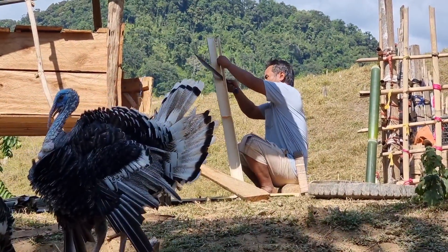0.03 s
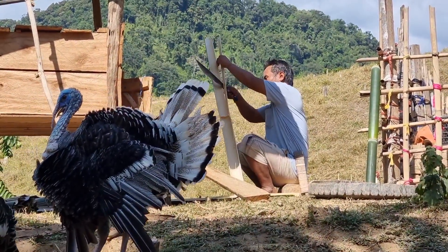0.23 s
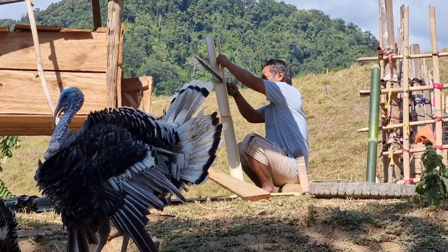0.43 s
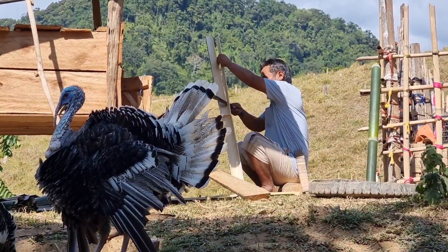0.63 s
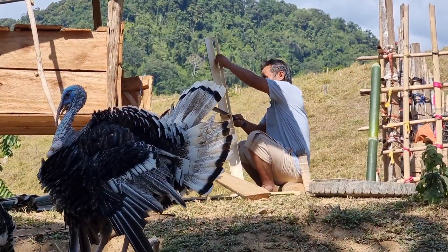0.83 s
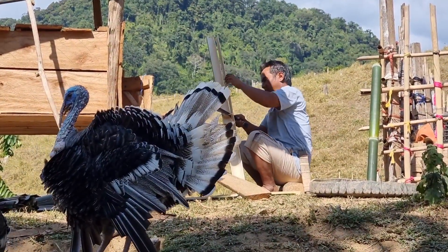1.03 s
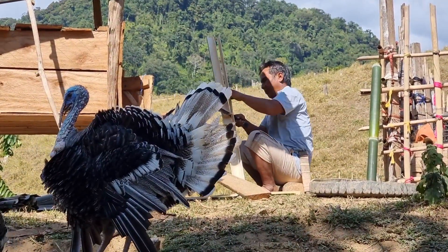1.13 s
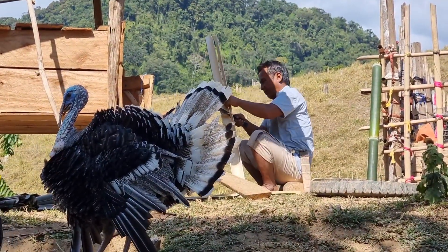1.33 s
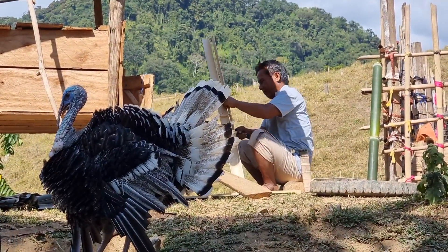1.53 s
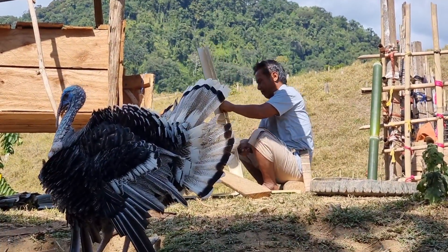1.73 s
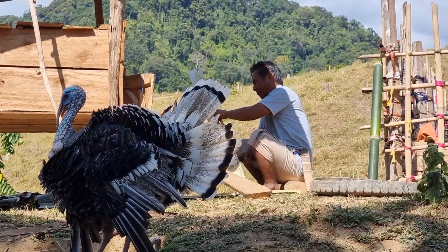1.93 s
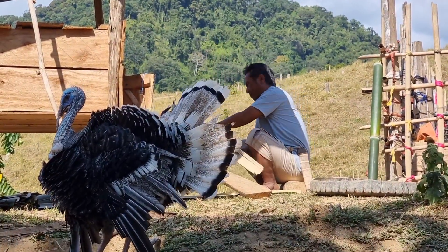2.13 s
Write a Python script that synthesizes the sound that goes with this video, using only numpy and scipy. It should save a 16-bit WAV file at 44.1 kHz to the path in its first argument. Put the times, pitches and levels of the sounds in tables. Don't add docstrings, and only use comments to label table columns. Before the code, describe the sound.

A bamboo pole splits with one sharp crack under a blade, followed by light scrapes and ticks

```python
import sys
import numpy as np
from scipy import signal
from scipy.fft import rfft, irfft
from scipy.io import wavfile
from scipy.ndimage import uniform_filter1d

SR = 44100
rng = np.random.default_rng(int(sys.argv[2]) if len(sys.argv) > 2 else 0)


def nominal_scale(level):
    x = np.asarray(level, float) / 20
    return 10 ** x


def log_audio(samples):
    frames = np.atleast_2d(samples).T
    limited = np.clip(frames, -1, 1)
    pcm = np.round(limited * 32767).astype(np.int16)
    wavfile.write(sys.argv[1], SR, pcm)


N = 97020


def evened(x):
    return x / np.sqrt(np.mean(x ** 2) + 1e-20)


def read(points, hz):
    f, value = np.transpose(points)
    return np.interp(np.log(hz + 1), np.log(f + 1), value)


def shape(x, gain):
    return irfft(rfft(x) * gain(np.fft.rfftfreq(N, 1 / SR)), N)


def high_pass(hz, cut_hz, steepness):
    return 1 / (1 + (cut_hz / (hz + 1)) ** steepness)


def ports(x, other, lead, alike, right_db=lambda hz: 0):
    def shared(hz):
        return np.clip(alike(hz), 0, 1)

    right = shape(x, lambda hz: shared(hz) * np.exp(-1j * lead(hz)))
    right = right + shape(other, lambda hz: np.sqrt(1 - shared(hz) ** 2))
    return np.array([x, shape(right, lambda hz: nominal_scale(right_db(hz)))])


def add(mix, s, sound):
    part = mix[round(s * SR):][:len(sound)]
    part += sound[:len(part)]


def ring(hz, db, t60):
    t = np.arange(4000) / SR
    return nominal_scale(db - 60 * t / t60) * np.sin(2 * np.pi * hz * t)


# (time [s], level [dB], left minus right [dB])
WIND_GUSTS = [(0.0, -42, -12), (0.12, -49, 7.5), (0.179, -43, 20.5), (0.21, -40.5, 5.5), (0.422, -32, 6),
              (0.45, -44.5, -10), (0.479, -37, 10), (0.69, -33, -1.5), (0.77, -36, 4.5),
              (0.91, -36.5, -4.5), (0.99, -34, 8.5), (1.05, -35.5, 10.5), (1.099, -30, -14.5),
              (1.14, -37, 16), (1.26, -34.5, -8.5), (1.3, -40, 3), (2.01, -53.5, -1.5), (2.2, -44, 7)]
# (frequency [Hz], level [dB])
WIND_COLOUR = [(12, -62), (20, -0.5), (43, -1.5), (67, 3.5), (162, -24), (264, -53), (331, -37.5),
               (400, -50), (520, -60), (880, -120)]


def wind():
    buffet_hz, usual_gust_db = 110, -37.5
    t = np.arange(N) / SR
    s, db, pan = np.transpose(WIND_GUSTS)
    level_db = np.interp(t, s, db)
    noise = rng.standard_normal((2, N))
    low = np.array([evened(shape(v, lambda hz: nominal_scale(read(WIND_COLOUR, hz)))) for v in noise])
    top = shape(low, lambda hz: high_pass(hz, buffet_hz, 10))
    low = low + top * (nominal_scale(level_db - usual_gust_db) - 1)
    return low * nominal_scale(level_db + 4.5 + np.outer([.5, -.5], np.interp(t, s, pan)))


# (frequency [Hz], level [dB])
HISS_COLOUR = [(100, 1.5), (300, -3.5), (880, 0), (1220, -0.5), (1900, -4), (6000, -7), (9000, -15.5),
               (15200, -27)]
# (frequency [Hz], share [0-1])
HISS_ALIKE = [(200, .7), (950, .955), (1300, .993), (2300, .5), (4400, .08), (15000, .1)]


def hiss():
    level_db, lag_s = -47.5, 0.00044
    rustle_s, rustle_db, rustle_hz = 1.35, 2, 7500
    frames = N // 128 + 8
    bins_hz = np.fft.rfftfreq(512, 1 / SR)
    patches = uniform_filter1d(rng.standard_normal((frames, 257)), 14, 0)
    patches = evened(uniform_filter1d(patches, 8, 1))
    flicker = evened(uniform_filter1d(rng.standard_normal(frames), 10))
    field = nominal_scale(read(HISS_COLOUR, bins_hz) + 2.1 * patches + 0.4 * flicker[:, None])
    late = np.clip((np.arange(frames) * 128 / SR - rustle_s) / 0.18, 0, 1)
    field = field * nominal_scale(rustle_db * np.outer(late, high_pass(bins_hz, rustle_hz, 4)))
    streams = []
    for a, b in rng.standard_normal((2, 2, frames, 257)):
        noise = signal.istft(((a + 1j * b) * field).T, nperseg=512, noverlap=384)[1]
        streams.append(evened(noise[:N]))
    return nominal_scale(level_db) * ports(*streams, lambda hz: 2 * np.pi * hz * lag_s,
                                 lambda hz: read(HISS_ALIKE, hz), lambda hz: 1.95 * (hz > 1500))


# (time [s], length [s], from [Hz], to [Hz], level [dB])
CHIRP_SLIDES = [(.018, 0.012, 5230, 4660, -62), (.036, 0.0087, 4840, 4240, -61),
                (.075, 0.024, 5300, 6700, -56.5), (.539, 0.01, 6300, 5400, -52.5),
                (.543, 0.0069, 4240, 3670, -57), (.595, 0.028, 6100, 5480, -55.5),
                (.772, 0.014, 6000, 5500, -52), (.785, 0.0066, 5430, 4650, -56.5),
                (.8, 0.004, 5100, 4800, -58), (.813, 0.012, 5410, 4640, -50.5),
                (.89, 0.021, 5200, 5160, -52), (.924, 0.014, 6150, 5300, -53.5),
                (.93, 0.0047, 5370, 4670, -54.5), (1.305, 0.017, 5300, 5000, -65),
                (1.378, 0.0088, 4770, 4200, -60), (1.425, 0.0076, 5550, 5800, -53),
                (1.583, 0.011, 4940, 3630, -55), (1.63, 0.015, 4900, 4000, -60),
                (1.69, 0.018, 5700, 4540, -60.5), (1.771, 0.021, 6630, 3840, -58),
                (1.85, 0.04, 5530, 5220, -60), (1.986, 0.042, 6120, 5870, -55),
                (2.022, 0.013, 6060, 5500, -56)]
# (time [s], length [s], end [Hz], middle [Hz], level [dB])
CHIRP_ARCHES = [(.074, 0.015, 5240, 4590, -59), (.522, 0.047, 6300, 6570, -60.5),
                (.616, 0.027, 5300, 4690, -51), (.66, 0.028, 4870, 4770, -49),
                (.78, 0.031, 6300, 6500, -62), (1.883, 0.027, 5270, 5680, -54),
                (1.12, 0.019, 6160, 6330, -67)]


def chirps():
    out = np.zeros(N)
    kinds = ((CHIRP_SLIDES, lambda u: u ** 1.22), (CHIRP_ARCHES, lambda u: np.sin(np.pi * u)))
    for rows, path in kinds:
        for s, length, a_hz, b_hz, db in rows:
            u = np.arange(0, 1, 1 / (length * SR))
            hz = a_hz + (b_hz - a_hz) * path(u)
            swell = nominal_scale(db + 8.0) * np.sin(np.pi * u) ** 0.36
            add(out, s, swell * np.sin(2 * np.pi * np.cumsum(hz) / SR))
    flutter = uniform_filter1d(uniform_filter1d(rng.standard_normal(N), 70), 70)
    return out * nominal_scale(3.8 * evened(flutter))


# (time [s], length [s], level [dB])
FAR_WHISTLES = [
    (.205, .04, -63),
    (.28, .12, -62),
    (1.0, .22, -62),
    (1.51, .08, -61),
    (1.62, .12, -66),
    (2.13, .06, -62),
]


def far_whistles():
    start_hz, sag_hz_per_s, width_hz = 4050, 1600, 180
    out = np.zeros(N)
    r = np.exp(-np.pi * width_hz / SR)
    noise = rng.standard_normal(N) + 1j * rng.standard_normal(N)
    fuzz = signal.lfilter([1], [1, -2 * r, r * r], noise)
    fuzz /= np.std(fuzz)
    for s, length, db in FAR_WHISTLES:
        t = np.arange(0, length, 1 / SR)
        turn = np.exp(2j * np.pi * np.cumsum(start_hz - sag_hz_per_s * t) / SR)
        swell = nominal_scale(db + 4) * np.sin(np.pi * t / length) ** .5
        add(out, s, swell * (fuzz[round(s * SR):][:len(t)] * turn).real)
    return out


def birds():
    lag_s, right_db, echo_db, echo_t60 = .000447, 6, -11, .09
    song = chirps() + far_whistles()
    tail = rng.standard_normal((2, 8000)) * nominal_scale(-60 * np.arange(8000) / SR / echo_t60)
    echo = signal.fftconvolve(song[None], tail / np.linalg.norm(tail[0]), axes=1)[:, :N]
    direct = ports(song, song, lambda hz: 2 * np.pi * hz * lag_s, lambda hz: 1,
                   lambda hz: right_db * (hz > 4200))
    return direct + nominal_scale(echo_db) * echo


# (frequency [Hz], phase [rad])
KNIFE_PHASE = [(400, 0), (1100, .9), (2450, 1.2), (2650, -2), (4600, -.3), (6400, .9), (9400, 3.9),
               (15000, 4)]
# (frequency [Hz], share [0-1])
KNIFE_LIKENESS = [(800, .75), (1500, .4), (2300, .45), (2800, .9), (5500, .8), (8000, .45), (12000, .2)]
# (frequency [Hz], right minus left [dB])
KNIFE_BALANCE = [(10500, 0), (12000, 8), (15000, 10)]


def knife_ports(x, other):
    return ports(x, other, lambda hz: read(KNIFE_PHASE, hz), lambda hz: read(KNIFE_LIKENESS, hz),
                 lambda hz: read(KNIFE_BALANCE, hz))


def struck(rows):
    out = np.zeros(N)
    for s, db, hz, t60 in rows:
        add(out, s, ring(hz, db, t60) * np.minimum(np.arange(4000) * hz / SR / 2, 1))
    return out


def fibres(spread_db):
    snaps_per_s, bed = 9000, .7
    size = nominal_scale(spread_db * np.minimum(rng.exponential(1, (2, N)), 4)) * rng.standard_normal((2, N))
    snaps = size * (rng.random((2, N)) < snaps_per_s / SR)
    return [evened(v) for v in snaps + bed * rng.standard_normal((2, N))]


# (frequency [Hz], level [dB])
FIBRE_COLOUR = [(500, -30), (800, -20), (1300, -30), (2600, -4), (4700, -7), (7500, -5), (10500, -4),
                (15000, -22)]


def fibre_colour_db(hz):
    return read(FIBRE_COLOUR, hz)


# (time [s], length [s], level [dB], brightness [dB per octave])
LIGHT_SCRAPES = [(0.132, 0.019, -51, -13), (.205, .02, -48, -7), (0.486, 0.013, -70, 2),
                 (0.928, 0.022, -54, -6.5), (.995, 0.037, -54, -7.5), (1.131, 0.02, -63, -4),
                 (1.421, .02, -57, -10), (1.512, 0.05, -58, -2), (1.55, .05, -58, -2),
                 (1.786, 0.014, -57, -2), (1.79, .028, -53, -6), (1.963, .007, -49, -6),
                 (1.967, .011, -48, -3), (1.976, 0.013, -45, -9), (1.992, 0.012, -46, -10),
                 (2.002, 0.018, -52, -11)]
# (time [s], level [dB], frequency [Hz], t60 [s])
POLE_TICKS = [(1.482, -37, 430, .03), (1.483, -41, 640, .03), (1.484, -43, 900, .03),
              (1.212, -42, 3300, .01), (1.9705, -32, 5400, .014), (1.9705, -32, 4050, .014),
              (1.973, -31, 4100, .008), (1.9845, -36, 2300, .01), (.208, -42, 2200, .015),
              (.244, -43, 2000, .02), (1.9805, -33, 6400, .01), (1.982, -32, 3200, .008),
              (1.9963, -30, 3250, .008), (1.9978, -28, 3300, .01), (1.998, -36, 4500, .008),
              (2.013, -38, 2750, .015)]


def scrapes():
    out = np.zeros((2, N))
    grain = np.array(fibres(spread_db=4.5))
    t = np.arange(N) / SR
    for s, length, db, tilt_db in LIGHT_SCRAPES:
        def colour(hz):
            tilt = tilt_db * np.log2(np.maximum(hz, 3000) / 4000)
            return nominal_scale(0.2 * fibre_colour_db(hz) + tilt - 16 * (hz < 1500))

        stroke = np.sin(np.pi * np.clip((t - s) / length, 0, 1) ** 0.6)
        out += shape(grain * stroke, colour) * nominal_scale(db + 11.0)
    return knife_ports(out[0] + struck(POLE_TICKS), out[1])


# (frequency [Hz], level [dB], t60 [s])
POLE_TONES = [(620, -14, .035), (1860, -5, .025), (2420, 2, .025), (2800, 1, .018), (3350, -3, .018),
              (4450, -3, .018), (4750, -2, .02), (5620, -6, .015), (6450, -4, .015), (9300, -3, .015)]
# (time [s], level [dB])
TEAR_EFFORT = [
    (.605, -91),
    (0.651, -38),
    (0.678, -30.5),
    (0.6845, -34.5),
    (0.6885, -15),
    (0.693, -17.5),
    (0.702, -27.5),
    (0.723, -41),
    (.79, -64),
]


def tearing():
    s, db = np.transpose(TEAR_EFFORT)
    effort = nominal_scale(np.interp(np.arange(N) / SR, s, db, -140, -140))
    pole = sum(ring(*tone) for tone in POLE_TONES)
    pole = pole / np.linalg.norm(pole)

    def colour(hz):
        return nominal_scale(fibre_colour_db(hz))

    norm = np.sqrt(np.mean(colour(np.fft.rfftfreq(N, 1 / SR)) ** 2))
    out = []
    for v in fibres(spread_db=1.5):
        direct = shape(v * effort, colour) / norm
        out.append(direct + nominal_scale(-12) * signal.oaconvolve(v * effort, pole)[:N])
    return np.array(out)


def snap():
    hz, db, t60 = 3000, -3.5, .0035
    tones = ring(hz, db - 4, t60) + ring(1.55 * hz, db - 4, t60) + ring(2.2 * hz, db - 9, t60)
    return tones * np.minimum(np.arange(4000) / 25, 1) * 2.5


def grind():
    start_s, end_s, level_db, centre_hz = .618, .692, -41, 1150
    u = np.clip((np.arange(N) / SR - start_s) / (end_s - start_s), 0, 1)
    stroke = nominal_scale(level_db) * np.sin(np.pi * u ** 1.38)

    def band(hz):
        return 1 / (1 + np.log2((hz + 1) / centre_hz) ** 4)

    return np.array([evened(shape(v, band)) for v in fibres(spread_db=4.5)]) * stroke


# (time [s], level [dB], frequency [Hz], t60 [s])
FREED_HALVES = [(.6862, -23, 2410, .05), (.6866, -12, 2790, .045), (.6864, -23, 3350, .045),
                (.6864, -26, 4450, .04), (.6868, -28, 4670, .04), (.6864, -25, 5630, .04),
                (.6868, -23, 6430, .04), (.687, -23, 1850, .07), (.686, -34, 620, .07),
                (.686, -35, 860, .06), (.689, -16, 11000, .008), (.6933, -23, 12300, .008),
                (.6925, -22, 9280, .03), (.687, -35, 730, .05)]


def split():
    snap_s = .6853
    crack = tearing()
    add(crack[0], snap_s, snap())
    crack = shape(crack, lambda hz: .25 + .75 * high_pass(hz, 1700, 8))
    add(crack[0], snap_s, ring(hz=215, db=-27, t60=0.04))
    a, b = crack + grind()
    halves = struck(FREED_HALVES)
    return knife_ports(a + halves, b + np.roll(halves, 37))


def scene():
    return wind() + hiss() + birds() + scrapes() + split()


def top_cut(x):
    return signal.sosfilt(signal.butter(12, 16480, fs=SR, output="sos"), x)


def record(dry):
    def edge(hz):
        slope_db = -14 * np.clip((hz - 15300) / 300, 0, 1)
        return nominal_scale(slope_db - 12 * (hz > 15750) - 60 * (hz > 16450))

    mix = shape(dry, edge)
    return top_cut(mix)


dry = scene()
out = record(dry)
log_audio(out)
```